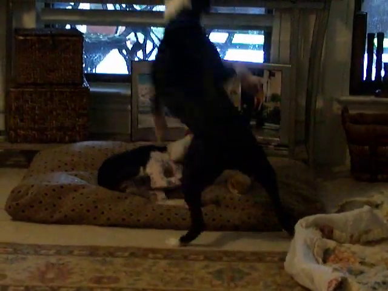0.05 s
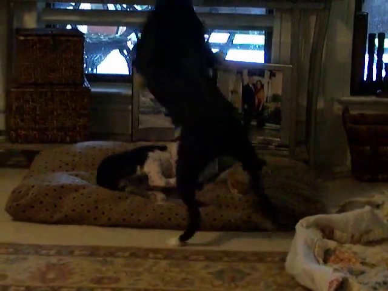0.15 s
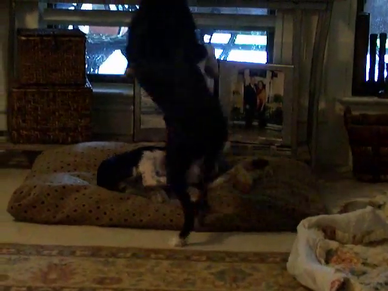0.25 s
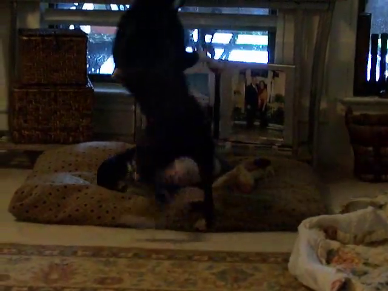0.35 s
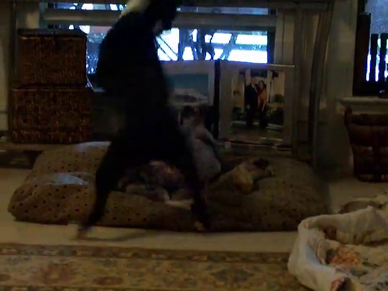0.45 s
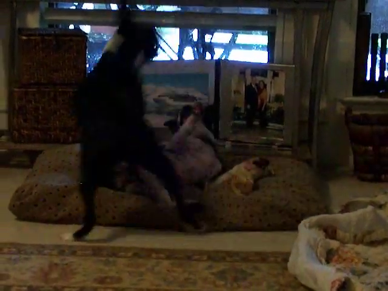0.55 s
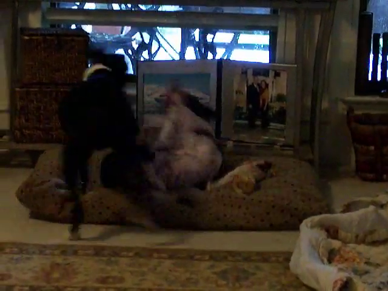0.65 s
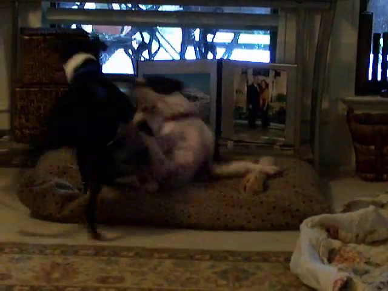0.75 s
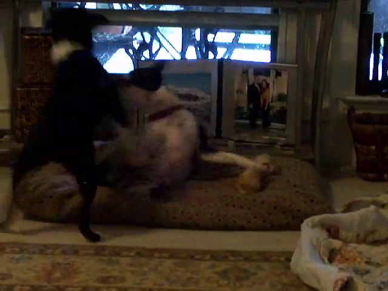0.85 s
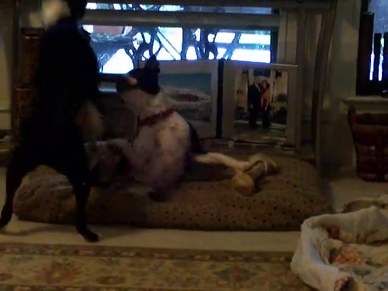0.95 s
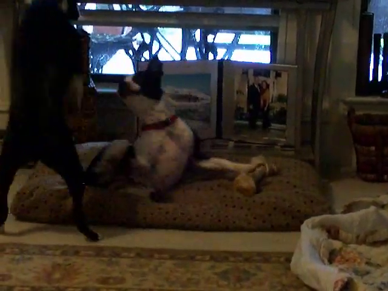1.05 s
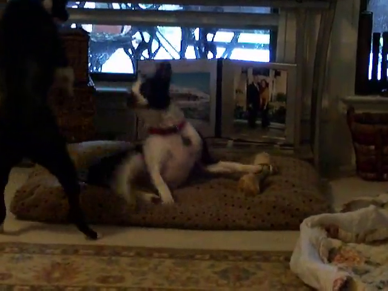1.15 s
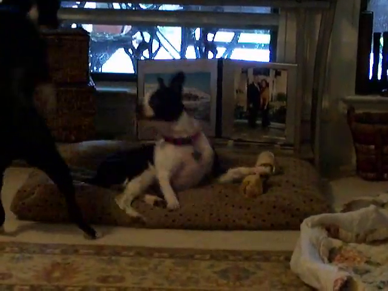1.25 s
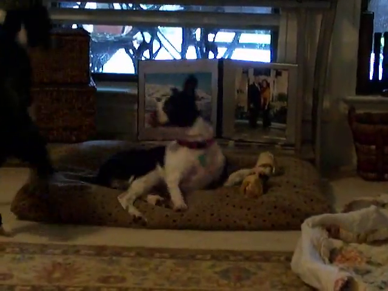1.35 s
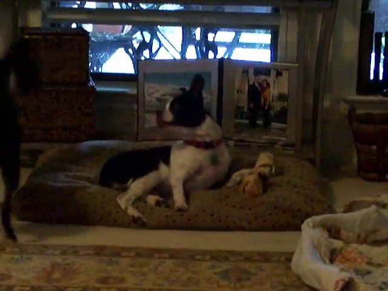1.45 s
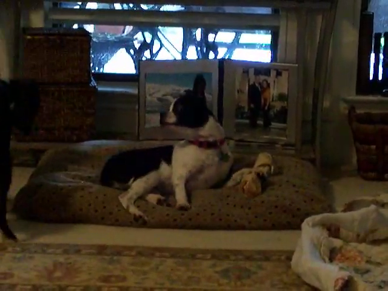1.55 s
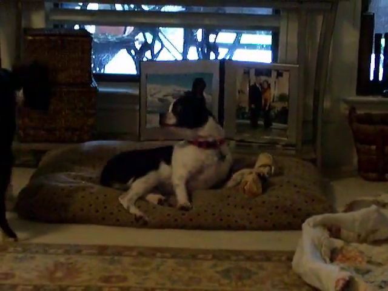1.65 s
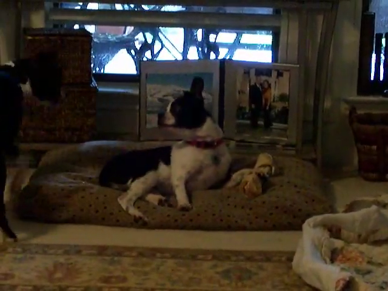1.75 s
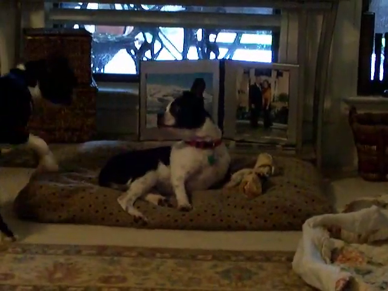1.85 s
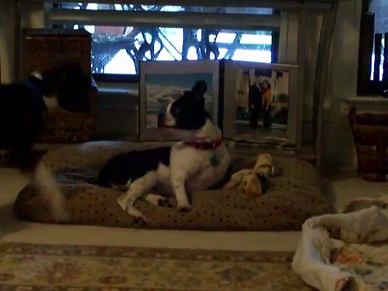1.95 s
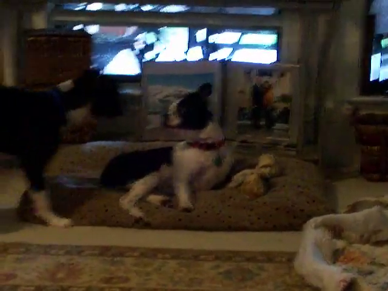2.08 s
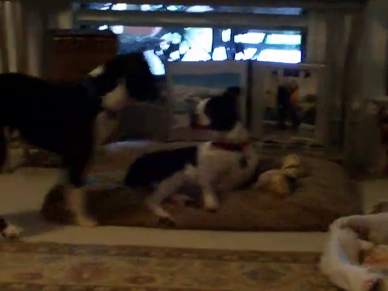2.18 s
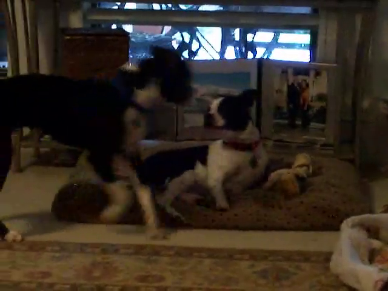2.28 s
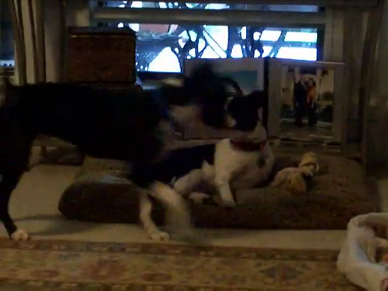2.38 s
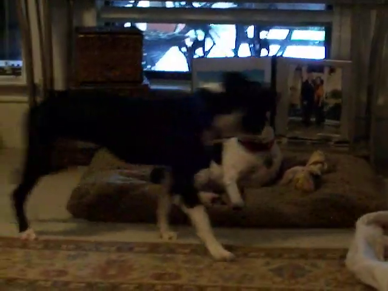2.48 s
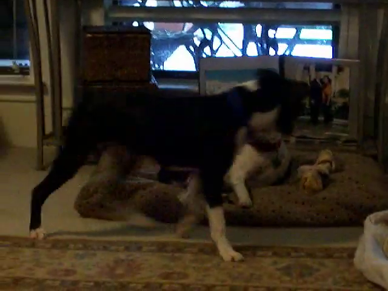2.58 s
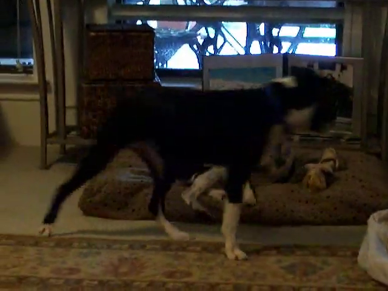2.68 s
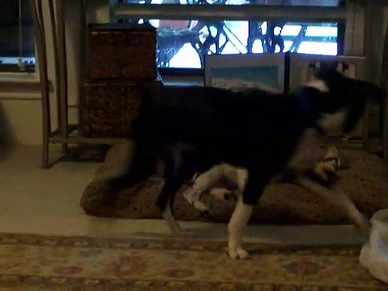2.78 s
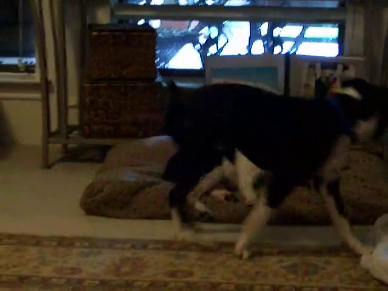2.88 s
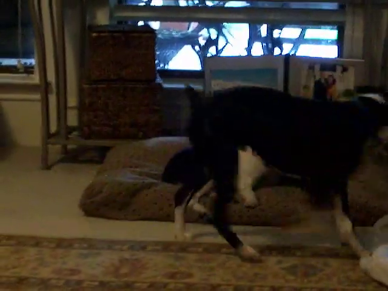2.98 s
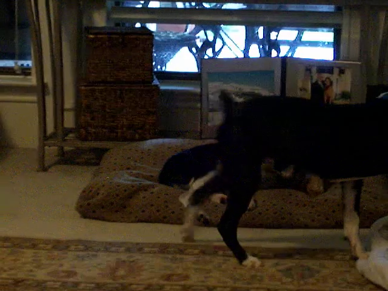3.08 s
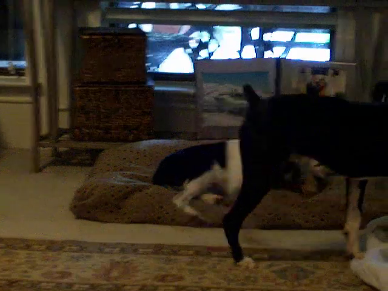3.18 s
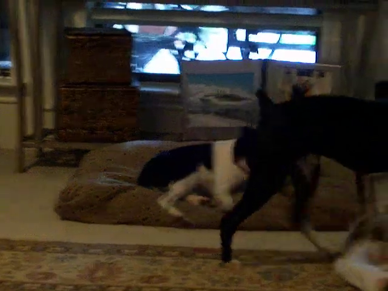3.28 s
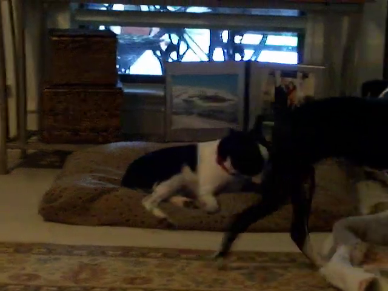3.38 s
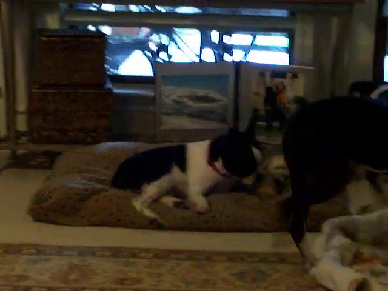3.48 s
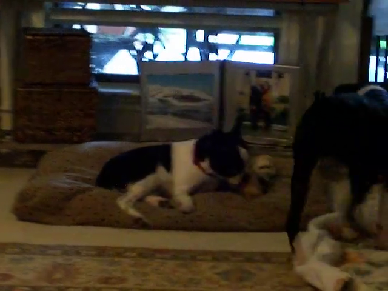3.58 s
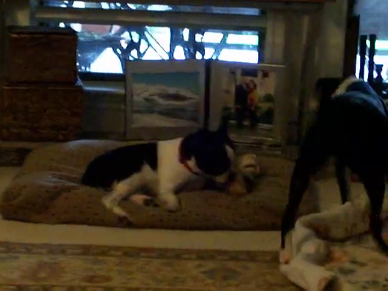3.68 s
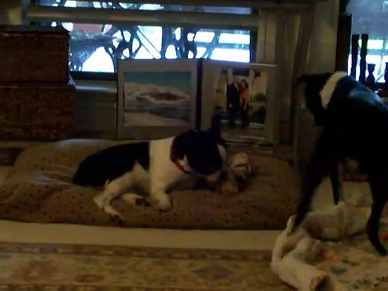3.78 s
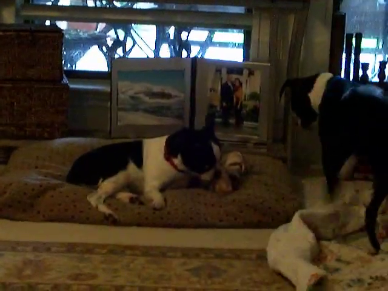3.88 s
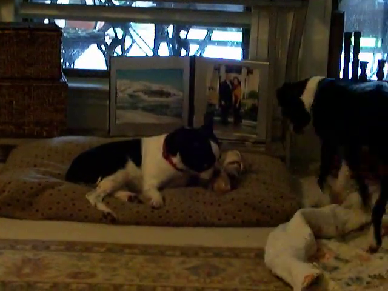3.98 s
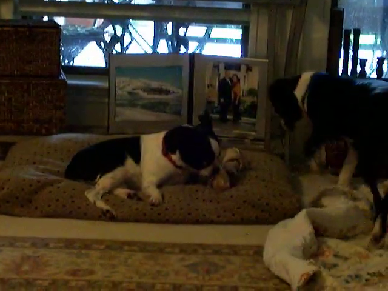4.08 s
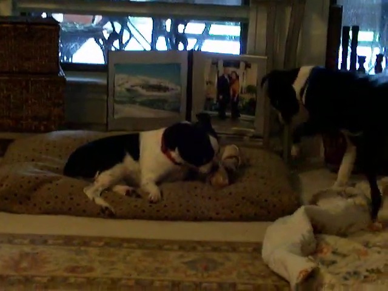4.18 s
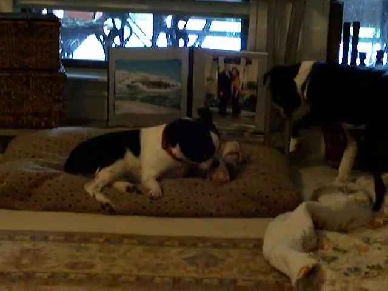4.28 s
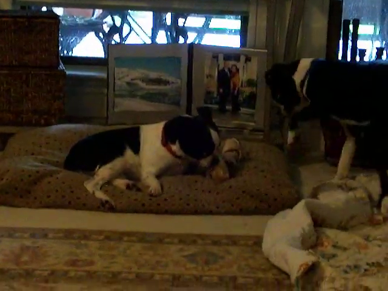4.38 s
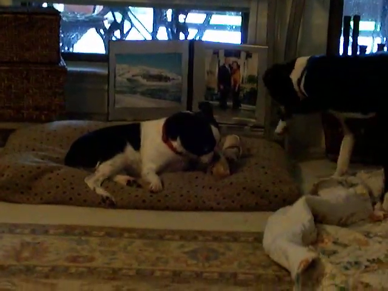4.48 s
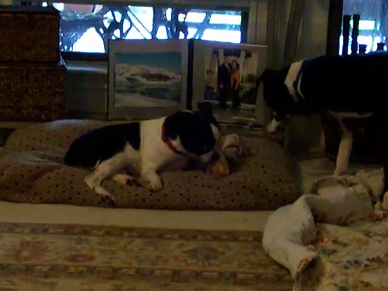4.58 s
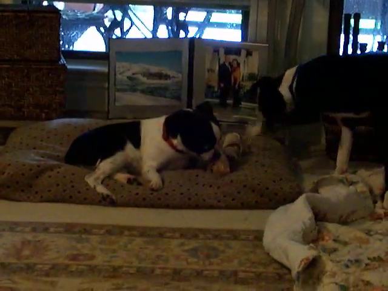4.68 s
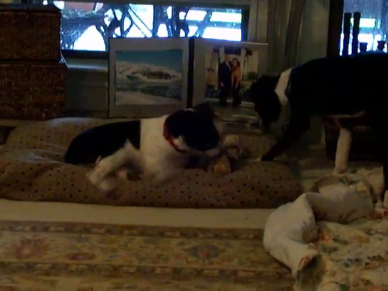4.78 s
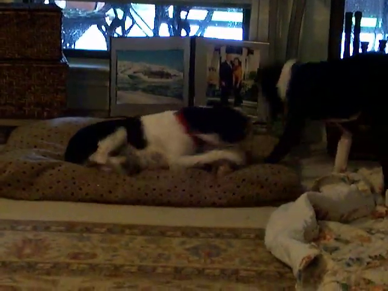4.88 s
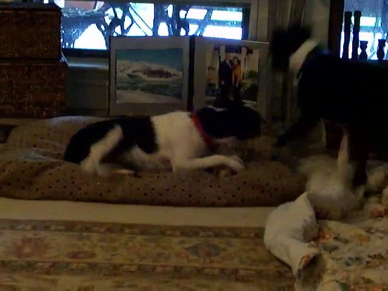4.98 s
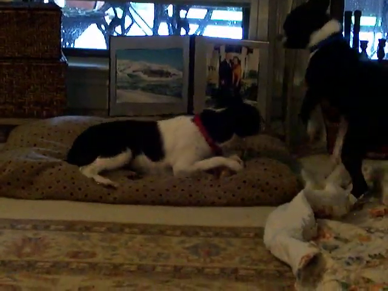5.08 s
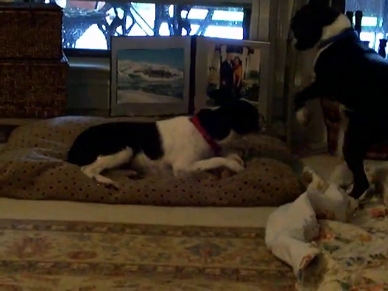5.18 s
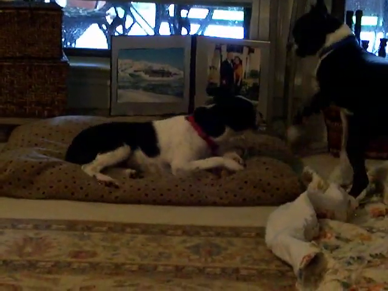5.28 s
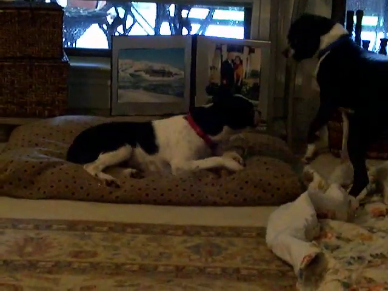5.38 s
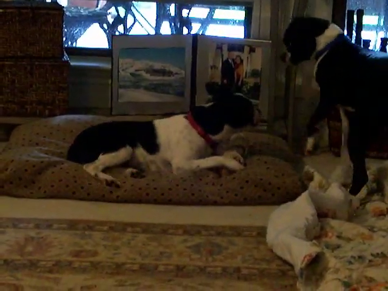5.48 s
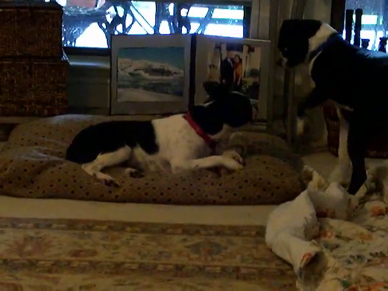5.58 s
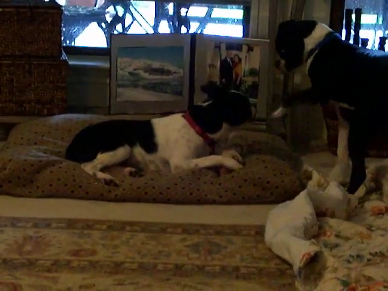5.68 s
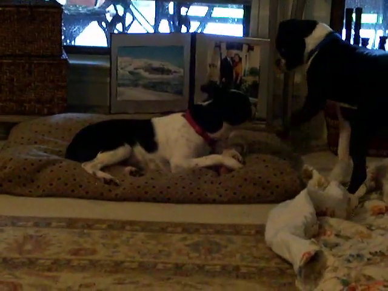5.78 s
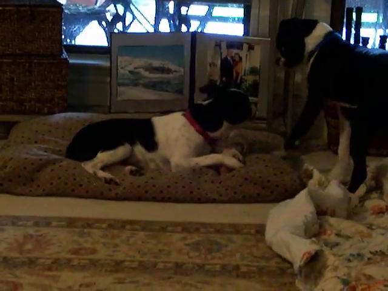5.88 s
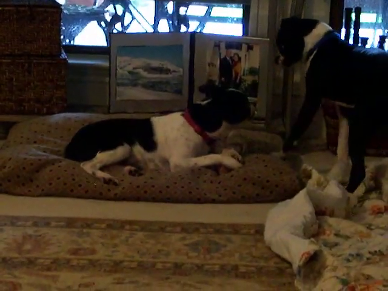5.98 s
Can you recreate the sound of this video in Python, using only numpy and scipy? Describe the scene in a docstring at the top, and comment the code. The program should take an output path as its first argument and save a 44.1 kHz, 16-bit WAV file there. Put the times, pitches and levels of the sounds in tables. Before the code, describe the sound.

In a carpeted room, a dog yelps sharply amid scuffling paws and ringing tags; after a quiet stretch, one short rough bark follows.

```python
"""In a carpeted room two small dogs squabble: one gives a shrill yelp, later a hoarse bark follows.
Huffs of filtered noise, a short gliding whimper, paws on a cushion and ringing collar tags surround them.
The yelp is a stack of sines that breaks into noise; the bark is pulses and air shaped by an opening throat.
The room rumbles, the microphone hisses and carries a thin whine: hiss and whine sink at the yelp,
creep back, and sink again after the bark."""
import sys
import numpy as np
from scipy import signal
from scipy.fft import rfft, irfft, next_fast_len
from scipy.io import wavfile
from scipy.ndimage import map_coordinates

SR = 44100
rng = np.random.default_rng(int(sys.argv[2]) if len(sys.argv) > 2 else 0)


def output_pcm(signal):
    """Save a mono or channel-first signal as 16-bit PCM at the path in sys.argv[1].

    Samples are clipped to [-1, 1] before scaling.
    """
    pcm = np.clip(np.atleast_2d(signal).T, -1, 1) * 32767
    wavfile.write(sys.argv[1], SR, np.round(pcm).astype(np.int16))


def ratio_of_db(decibels):
    """Turn decibels (scalar or array-like) into linear amplitude factors; 0 dB maps to 1."""
    return 10 ** (np.asarray(decibels, float) / 20)


N = 266584
TIME = np.arange(N) / SR


def unit(x):
    """Scale to rms 1."""
    return x / np.sqrt(np.mean(x ** 2) + 1e-20)


def along(points, hz):
    """Read a curve of (Hz, value) points on a log frequency axis."""
    point_hz, value = np.transpose(points)
    return np.interp(np.log(hz + 1), np.log(point_hz + 1), value)


def curves(rows):
    """One value per sample for each column after the time, and a mask of the span."""
    s, *columns = np.transpose(rows)
    on = (TIME >= s[0]) & (TIME <= s[-1])
    return [np.interp(TIME, s, column) for column in columns] + [on]


def wobble(rate):
    """A smooth random curve with this many knots a second."""
    knots = rng.standard_normal(int(N * rate / SR) + 4)
    return map_coordinates(knots, [TIME * rate])


def filtered(x, response):
    """Filter x by a complex response of frequency."""
    size = next_fast_len(len(x) + 8192)
    hz = np.fft.rfftfreq(size, 1 / SR)
    return irfft(rfft(x, size) * response(hz), size)[:len(x)]


def resonances(modes):
    """Causal response of parallel (Hz, width Hz, dB) resonances with alternating sign."""
    def response(f):
        return sum((-1) ** k * ratio_of_db(db) * 1j * f * width / (hz * hz - f * f + 1j * f * width)
                   for k, (hz, width, db) in enumerate(modes))
    return response


def noise(spectrum):
    """Coloured noise of rms 1."""
    return unit(filtered(rng.standard_normal(N), lambda hz: ratio_of_db(along(spectrum, hz))))


def swell(t, rise, hold, t60, bend):
    """Attack, hold and release from t = 0; bend curves the attack."""
    attack = np.clip(t / max(rise, 1e-3), 0, 1) ** bend
    return attack * ratio_of_db(-60 * np.clip(t - rise - hold, 0, 1) / t60)


def add(out, s, x):
    """Mix x into out from time s."""
    part = out[round(s * SR):][:len(x)]
    part += x[:len(part)]


# Breath through nose and mouth: start_s, length_s, level_db, resonance_hz, hiss_db
HUFF_BREATHS = [(0, 0.0056, -33.5, 1696, -16), (0.196, 0.026, -52, 4470, -5),
                (0.477, 0.025, -59, 1860, -17), (0.521, .05, -53.5, 2800, -14),
                (0.559, 0.15, -45, 2380, -10), (.735, .028, -42.5, 3700, -18),
                (0.792, 0.031, -52, 468, -16), (1.415, .012, -69.5, 1700, -21),
                (1.497, 0.05, -50, 970, -10.5), (1.688, 0.025, -73.5, 1706, -12.5),
                (2.033, 0.054, -65, 1480, -16), (2.08, 0.03, -66, 625, -23), (2.659, 0.028, -67, 4300, -10),
                (3.244, .08, -57, 1730, -25), (3.306, 0.068, -57.5, 1480, -25),
                (3.33, 0.057, -61.5, 642, -25), (4.748, 0.012, -41.5, 1820, -6.5),
                (4.779, .016, -44.5, 3003, -4.5), (5.679, 0.15, -60, 2680, -1.5)]


def huffs():
    """Air pushed through nose and mouth: two resonances over a broad hiss."""
    rise_share, t60_s = .38, .19  # share of the length that swells; dying time
    nose_hz = 2330  # all huffs share this one
    out, t = np.zeros(N), TIME[:SR // 2]
    for s, length, db, hz, hiss_db in HUFF_BREATHS:
        tract = resonances([(hz, 170, 0), (nose_hz, 220, -4), (5000, 6000, hiss_db)])
        air = unit(filtered(rng.standard_normal(len(t)), tract))
        shape = swell(t, rise_share * length, (1 - rise_share) * length, t60_s, .58)
        add(out, max(s, 0), ratio_of_db(db) * shape * air)
    return out


# Scuffles on the cushion, timed where each is fully up: full_s, hold_s, level_db
PAW_SCUFFLES = [(0, .005, -49), (.216, 0.0041, -55.5), (.485, 0.096, -43), (.634, .04, -53),
                (.79, 0.016, -58.5)]
# Body of the cushion and floor: resonance_hz, width_hz, level_db
CUSHION = [(160, 60, -3.5), (280, 80, 0), (400, 120, -1.5), (600, 300, -6)]
# Claw ticks, level going into their resonances: start_s, level_db, resonance_hz, width_hz
CLAW_TICKS = [(0.2165, -32, 5200, 3000), (.644, -18, 4300, 901), (1.4035, -42.5, 1800, 4000),
              (1.8, -57.5, 2700, 3000), (2.5429, -46.5, 4200, 1494), (5.058, -38.5, 5000, 3000)]


def paws():
    """Lumpy noise through the cushion's resonances for scuffles, dying noise bursts for claw ticks."""
    rise_s, t60_s = .03, .2
    shape = sum(ratio_of_db(db) * swell(TIME - s + rise_s, rise_s, hold, t60_s, 1.9) for s, hold, db in PAW_SCUFFLES)
    lumpy = rng.standard_normal(N) * ratio_of_db(3.1 * wobble(55))
    out = shape * unit(filtered(lumpy, resonances(CUSHION)))
    t = TIME[:SR // 20]
    for s, db, hz, width in CLAW_TICKS:
        crack = rng.standard_normal(len(t)) * ratio_of_db(-60 * t / 0.009026)
        claw = resonances([(hz, width, 0), (hz / 2, width / 2, -3)])
        add(out, s, ratio_of_db(db) * filtered(crack, claw))
    return out


# Level of the whine, which the hiss rides on: time_s, level_db
WHINE_LEVEL = [(0, -65), (.66, -64.5), (.72, -77.5), (1.75, -81.5), (3.5, -70), (4.9, -69), (5.3, -76),
               (6.04, -75.5)]
# Colour of the microphone hiss before scaling to rms 1: frequency_hz, density_db
HISS_COLOUR = [(32, -29.5), (55, 1), (140, -8.5), (166, -5), (205, -12), (277, -11.5), (365, -19.5),
               (414, -17.5), (675, -25), (835, -24.5), (1220, -30), (6430, -36.5), (7150, -33.5),
               (8840, -57), (11500, -88), (19400, -120)]
# Colour of the room rumble before scaling to rms 1: frequency_hz, density_db
RUMBLE_COLOUR = [(4, -25), (9, -6), (16, -0.5), (26, 0), (40, -3), (60, -14.5), (90, -23), (150, -60.5)]


def background():
    """Noise hiss and sine whine rise and sink together; low noise follows in part and comes in lumps."""
    whine_hz, hiss_over_whine_db = 6903.3, 20
    rumble_base_db, rumble_follows = -51.5, .4  # share of the whine's swings that the rumble follows
    throb_s, throb_peak_db, throb_rise_s, throb_fall_s = 1.47, 11, .04, .4  # the rumble swells once
    whine_db, _ = curves(WHINE_LEVEL)
    throb_db = np.interp(TIME - throb_s, [-throb_rise_s, 0, throb_fall_s], [0, throb_peak_db, 0])
    rumble_db = rumble_base_db + rumble_follows * (whine_db - whine_db.mean()) + throb_db
    rumble_db += 2.5 * wobble(12.0) + 1.5 * wobble(3.5)
    whine = np.sqrt(2) * np.sin(2 * np.pi * whine_hz * TIME)
    hiss = ratio_of_db(hiss_over_whine_db + 0.24 * wobble(2.5)) * noise(HISS_COLOUR)
    return ratio_of_db(whine_db) * (whine + hiss) + ratio_of_db(rumble_db) * noise(RUMBLE_COLOUR)


# How long the carpeted room rings: frequency_hz, t60_s
ROOM_DECAY = [(200, .3), (600, 0.4), (1300, 0.39), (2700, 0.33), (6000, .33), (9000, 0.12)]


def room(x):
    """Noise tails build up as walls answer, then each frequency dies at its own speed."""
    out, size = np.zeros(N), SR // 20
    for start in range(0, N, size):  # a new tail every twentieth of a second
        hz, t, z = signal.stft(rng.standard_normal(SR // 2), SR, nperseg=256)
        decay = ratio_of_db(-60 * t / along(ROOM_DECAY, hz)[:, None])
        tail = signal.istft(z * (1 - np.exp(-t / 0.003)) * decay, SR, nperseg=256)[1]
        tail /= np.linalg.norm(tail)
        add(out, start / SR + .004, signal.fftconvolve(x[start:start + size], tail))
    return out


# Touches of the collar tags: time_s, level_db, extra level of the lowest ring low_db
TAG_TOUCHES = [(0.1136, -58, -16.5), (0.1501, -45, -11), (0.2164, -38.5, -18), (0.2269, -42, -18),
               (0.2643, -46, -14), (0.6025, -38.5, -20), (0.8964, -57, -11), (0.9283, -55, -15),
               (0.9572, -52, -13.5), (1.0071, -57, -3), (1.1757, -59.5, -12.5), (2.0303, -63, -19),
               (2.06, -66, -15), (2.0794, -68, -15), (2.6818, -61, -16), (2.6983, -60, -14),
               (2.7621, -61.5, -14), (2.828, -59, -9), (2.8504, -52.5, -5), (5.0609, -56, -15),
               (5.1, -63, -18), (5.1223, -63, -11.5), (5.225, -65, -15), (5.2495, -64, -15.5)]
# Pitches of the thin metal plates: ring_hz
TAG_RINGS = [6430, 6500, 5230]
# Strength and decay of each of those pitches: level_db, t60_s
TAG_DECAYS = [(-0.5, 0.12), (-1, 0.079), (-2.5, .17)]


def tags():
    """Thin metal plates ring at each touch: three dying sines with a soft onset and a shaking level."""
    onset_s = .003
    out, t = np.zeros(N), TIME[:SR // 3]
    phases = rng.random((len(TAG_TOUCHES), len(TAG_DECAYS)))  # in turns
    for (s, db, low_db), phase in zip(TAG_TOUCHES, phases):
        ring = np.zeros(len(t))
        for hz, (level, t60), p in zip(TAG_RINGS, TAG_DECAYS, phase):
            ring_db = level + (low_db if hz < 6000 else 0) - 60 * t / t60
            ring += ratio_of_db(ring_db) * np.sin(2 * np.pi * (hz * t + p))
        add(out, s - onset_s, ratio_of_db(db) * ring * (1 - np.exp(-t / onset_s)))
    return out * ratio_of_db(3.5 * wobble(90))


# Course of the yelp: time_s, pitch_hz, effort_db
YELP_COURSE = [(.669, 980.6, -49.5), (.6715, 959, -12), (.675, 884, -16), (.679, 888, -15),
               (.6845, 1128, -12), (.699, 1151, -19), (.705, 1319, -14.5), (.718, 1350, -14.5),
               (.735, 1333, -16), (.739, 1302, -20.5), (.745, 1266, -19), (.775, 1298, -27.5),
               (.8, 1270, -48.5)]
# The voice catches before it locks: time_s, depth_db
YELP_CATCHES = [(.676, 5), (.681, 13), (.691, 12.5), (.7025, 9)]
# Fundamental against the second harmonic, by its pitch: pitch_hz, level_db
YELP_FUNDAMENTAL = [(900, -18.5), (1120, -14), (1250, -8)]
# Harmonics 3 to 5 against the second, by where they fall: frequency_hz, level_db
YELP_HARMONICS = [(2700, -22), (3400, -28.5), (4050, -22), (4500, -33.5), (5400, -31), (5650, -14),
                  (6100, -32), (6800, -34)]
# Mouth that colours the rasp: resonance_hz, width_hz, level_db
RASP_MOUTH = [(1350, 390, -2.5), (2200, 700, -2), (3700, 420, -4), (5800, 760, -13.5)]


def yelp():
    """A tight, high voice led by its second harmonic; it catches, locks clean, then breaks into rasp."""
    catch_half_width_s = .0024
    lock_s, break_s, crack_takes_s = .704, .735, 0.022  # turns clean, breaks, time to go hoarse
    rough_start, rough_locked, rough_end = .3, 0.036, .85  # share of rasp 0-1
    thin_s, thin_half_width_s, thin_db = .724, .009, 22.5  # the fundamental dips in the clean tone
    hz, effort_db, on = curves(YELP_COURSE)
    for s, depth_db in YELP_CATCHES:
        effort_db = effort_db - depth_db * np.exp(-((TIME - s) / catch_half_width_s) ** 2)
    hoarse = (rough_end - rough_locked) * np.clip((TIME - break_s) / crack_takes_s, 0, 1)
    rough = np.where(TIME < lock_s, rough_start, rough_locked + hoarse)
    turn = 2 * np.pi * np.cumsum(hz * (1 + 0.058 * rough * wobble(300))) / SR
    thinning_db = thin_db * np.exp(-((TIME - thin_s) / thin_half_width_s) ** 2)
    tone = np.sin(2 * turn) + ratio_of_db(along(YELP_FUNDAMENTAL, hz) - thinning_db) * np.sin(turn)
    for k in range(3, 6):
        tone += ratio_of_db(along(YELP_HARMONICS, k * hz) + 3.5 * wobble(150)) * np.sin(k * turn)
    flutter = ratio_of_db(6 * rough * wobble(400))  # uneven folds shake the level
    rasp = unit(filtered(rng.standard_normal(N), resonances(RASP_MOUTH)))
    clean_share = np.sqrt(2 - 2 * rough ** 2)
    return on * ratio_of_db(effort_db) * (clean_share * flutter * tone + rough * rasp)


# Partials of the whimper: multiple, level_db
WHIMPER_PARTIALS = [(1, -2), (2, -14.5), (3, -23.5), (4, -27.5), (5, -25.5)]


def whimper():
    """A short, soft stack of sines that slides up a little; the overtones die first."""
    start_s, level_db, first_hz, glide_hz_per_s = 2.657, -43, 501.7, 301.5
    rise_s, hold_s, t60_s, shake_db = 0.011, 0.024, 0.12, 3  # t60 of the fundamental
    t = np.clip(TIME - start_s, 0, 1)
    turn = 2 * np.pi * (first_hz + glide_hz_per_s * t / 2) * t + .25 * wobble(60)
    note = np.zeros(N)
    for k, partial_db in WHIMPER_PARTIALS:
        shape = swell(t, rise_s, hold_s, t60_s / k ** .4, 1)
        note += ratio_of_db(partial_db + shake_db * wobble(60)) * np.sin(k * turn) * shape
    return ratio_of_db(level_db) * note


# Course of the bark, two pulses to a cycle: time_s, cycle_hz, effort_db
BARK_COURSE = [(4.803, 261.6, -55), (4.812, 268.2, -38), (4.85, 298.4, -15), (4.864, 288.7, -22),
               (4.877, 288.8, -17), (4.922, 286.3, -18.5), (4.93, 280.7, -27), (4.945, 280, -26.5),
               (4.97, 273.7, -37)]
# Throat with the mouth narrow: resonance_hz, width_hz, level_db
NARROW_THROAT = [(602, 156, -11), (865, 160, -2), (1188, 150, -0.5), (1740, 300, -11.5), (2580, 320, -5.5),
                 (3640, 630, -13.5), (5930, 900, -22.5)]
# Throat with the mouth wide: resonance_hz, width_hz, level_db
WIDE_THROAT = [(614, 90, -9.5), (1237, 160, -1), (1450, 150, 0.5), (1766, 370, -11), (2288, 320, -5.5),
               (2810, 320, -4), (3597, 500, -11), (6040, 1800, -23.5)]


def bark():
    """Uneven pulses and air gated by their cycle pass a throat that opens; the chest thumps early on."""
    open_s, open_takes_s, open_wide = 4.868, .006, .85  # middle of the move, time constant, share 0-1
    chest_s, chest_peak_db, chest_rise_db_per_s, chest_fall_db_per_s = 4.845, -29.5, 699.5, 800
    hum_db = -13.5  # a clean low partial once the mouth is open
    rate, effort_db, on = curves(BARK_COURSE)
    cycle = np.cumsum(rate * (1 + .03 * wobble(150))) / SR
    pulses = (np.diff(np.floor(2 * cycle), prepend=0) > 0) * ratio_of_db(2.5 * wobble(250))
    pulses *= np.where(cycle % 1 < .5, 1, .45)  # strong and weak closures alternate
    air = rng.standard_normal(N) * np.exp(-1.5 * (cycle % 1))
    source = 0.54 * unit(pulses) + 0.78 * unit(air)
    source = filtered(source, lambda f: (1j * f / (380 + 1j * f)) ** 3)  # a small throat passes little bass
    opening = open_wide * (1 + np.tanh((TIME - open_s) / open_takes_s)) / 2
    narrow = unit(filtered(source, resonances(NARROW_THROAT)))
    wide = unit(filtered(source, resonances(WIDE_THROAT)))
    hum = ratio_of_db(hum_db + 2.4 * wobble(40)) * np.sin(4 * np.pi * np.cumsum(rate) / SR)
    voice = (1 - opening) * narrow + opening * (wide + hum)
    chest_modes = [(165, 27, -5), (201.8, 36.0, -0.244), (250.2, 63, -1.33)]
    chest = unit(filtered(rng.standard_normal(N), resonances(chest_modes)))
    chest_drop_db = np.maximum(chest_rise_db_per_s * (chest_s - TIME), chest_fall_db_per_s * (TIME - chest_s))
    return on * (ratio_of_db(effort_db) * voice + ratio_of_db(chest_peak_db - chest_drop_db) * chest)


def scene():
    """Both dogs, their paws and tags, heard directly and through the room."""
    dogs = huffs() + paws() + tags() + yelp() + whimper() + bark()
    return (dogs + ratio_of_db(-10.5) * room(dogs))[None]


def band_limit(x):
    """A steep low-pass at the top of the band."""
    return signal.sosfilt(signal.butter(12, 8990, fs=SR, output="sos"), x)


# Response of the small microphone: frequency_hz, gain_db
MICROPHONE_RESPONSE = [(20, 5), (6500, -0.5), (7500, -3), (8300, -13.5), (8900, -27.5), (9200, -50.5),
                       (9500, -90.5)]


def record(dry):
    """A small microphone, dull above 7 kHz, hears the dogs; the background is added after it."""
    heard = filtered(dry[0], lambda hz: ratio_of_db(along(MICROPHONE_RESPONSE, hz)))
    mix = heard + background()
    return band_limit(mix[None])


dry = scene()
out = record(dry)
output_pcm(out)
```